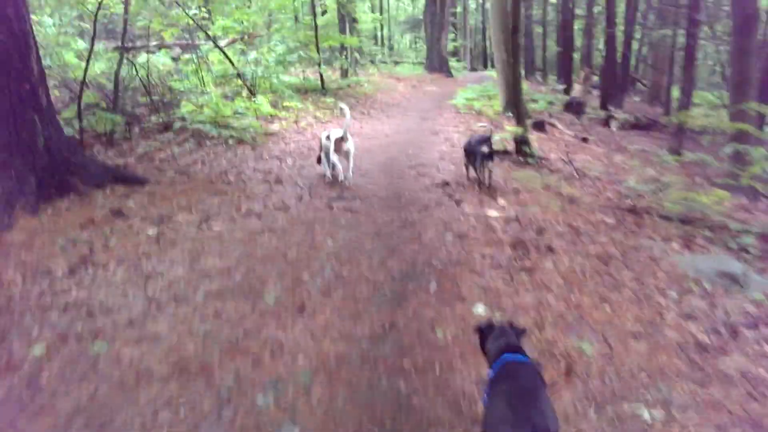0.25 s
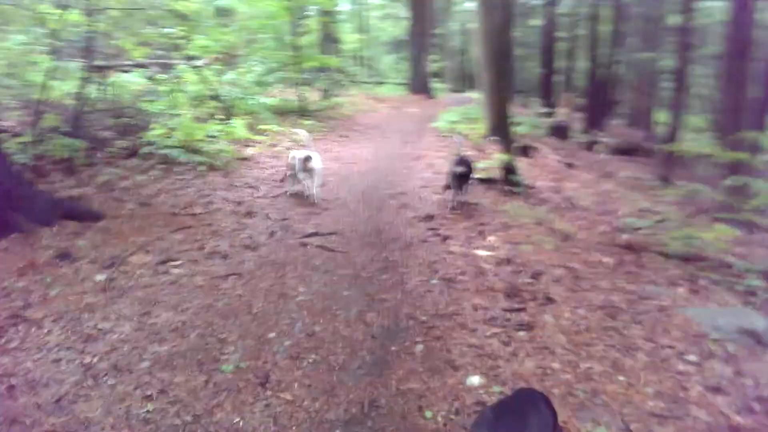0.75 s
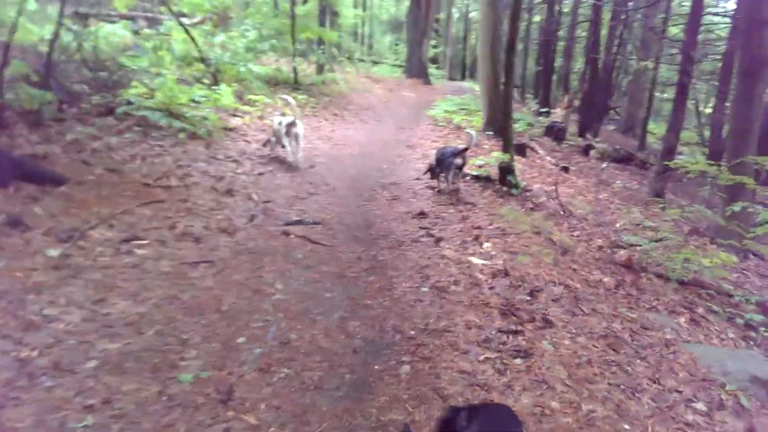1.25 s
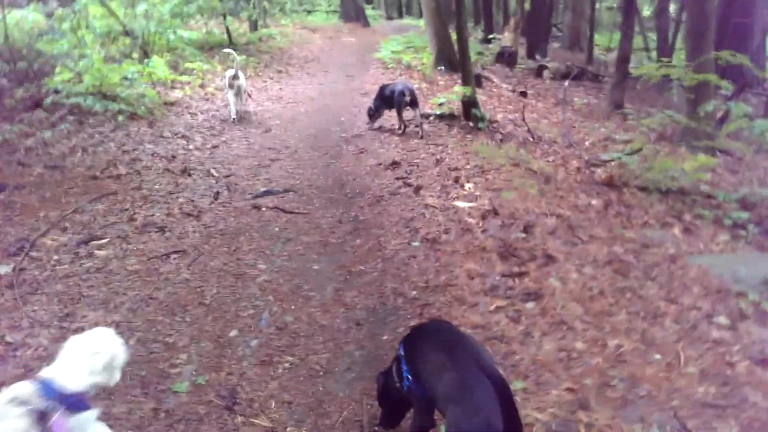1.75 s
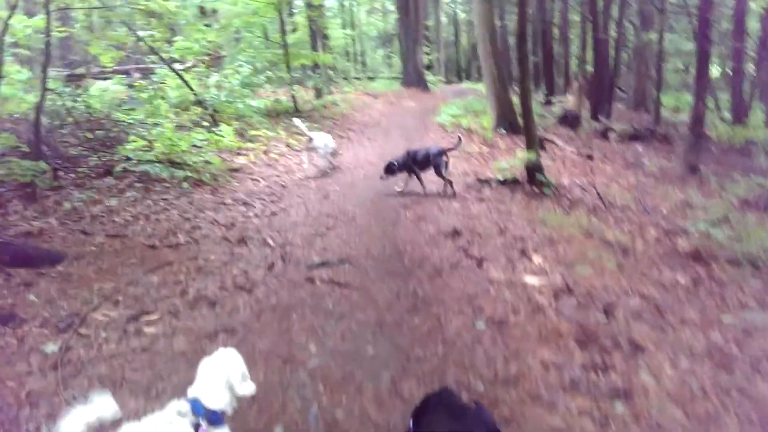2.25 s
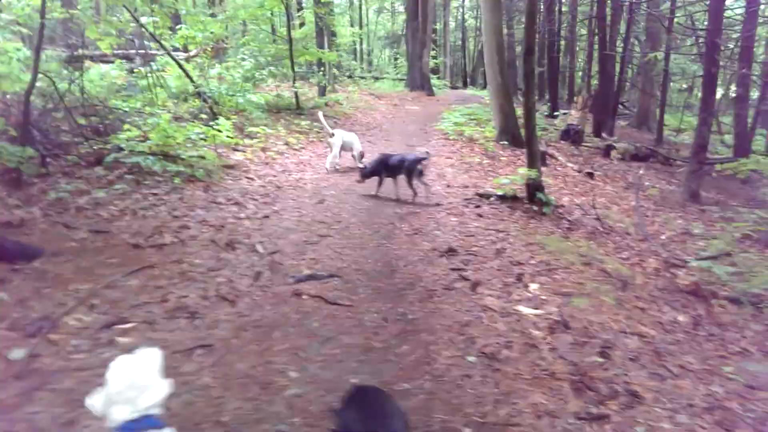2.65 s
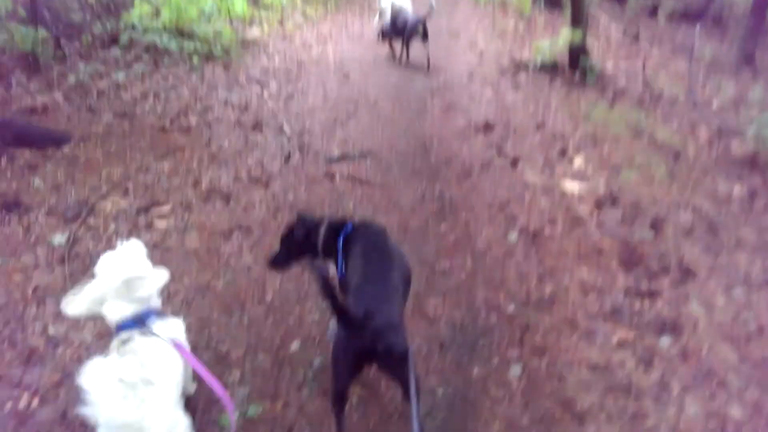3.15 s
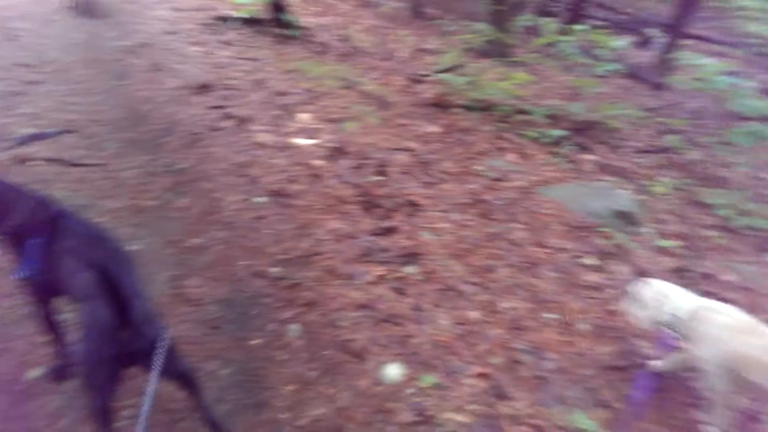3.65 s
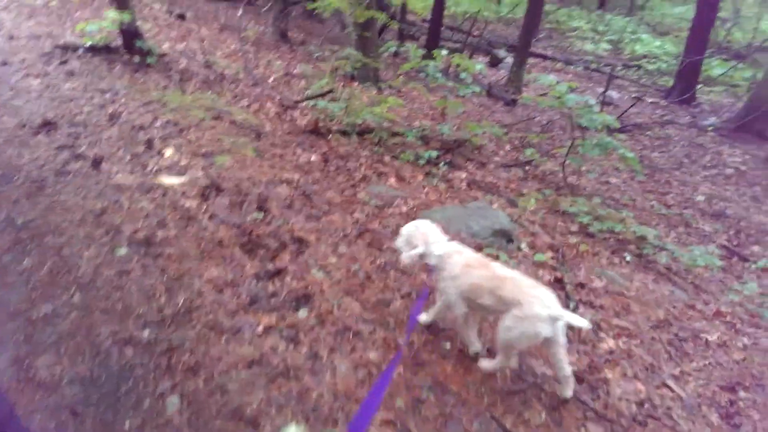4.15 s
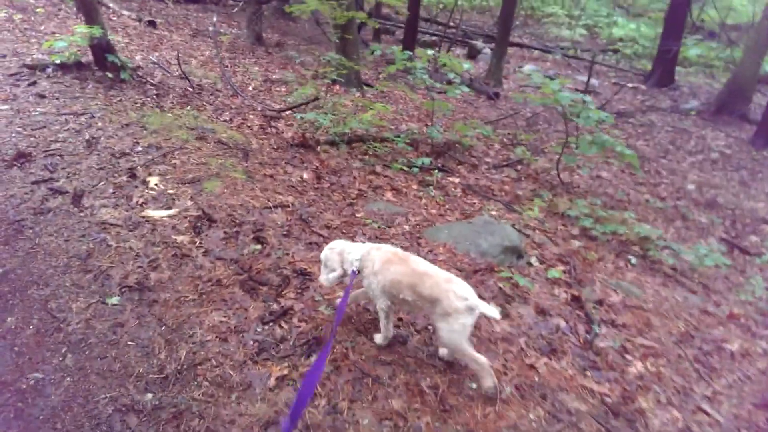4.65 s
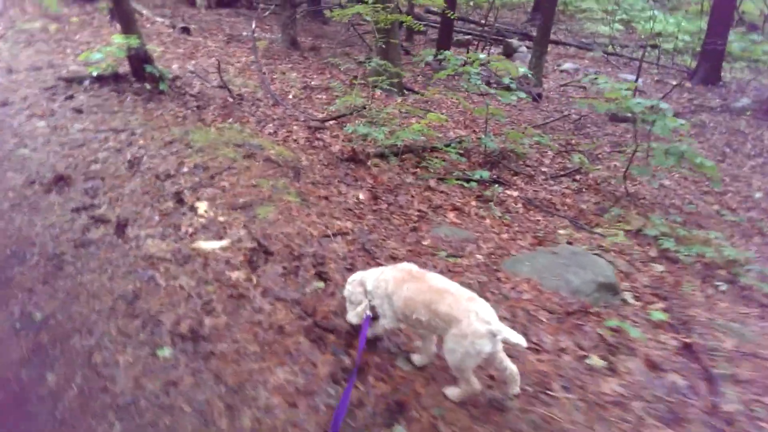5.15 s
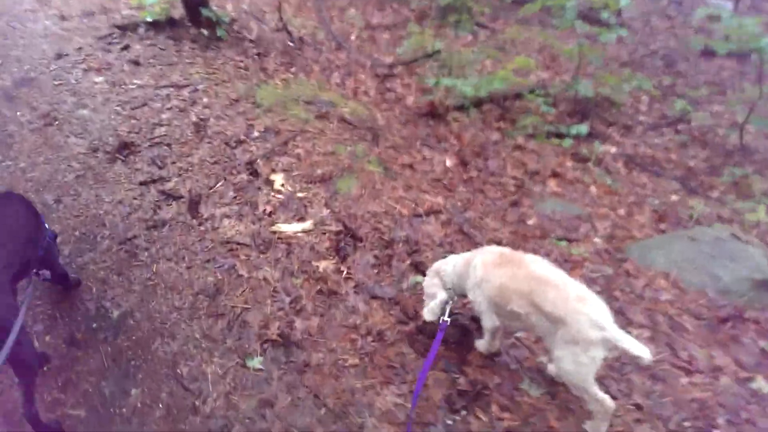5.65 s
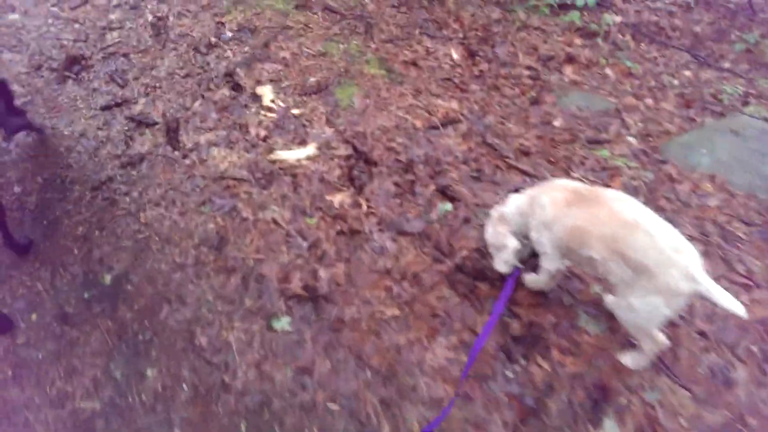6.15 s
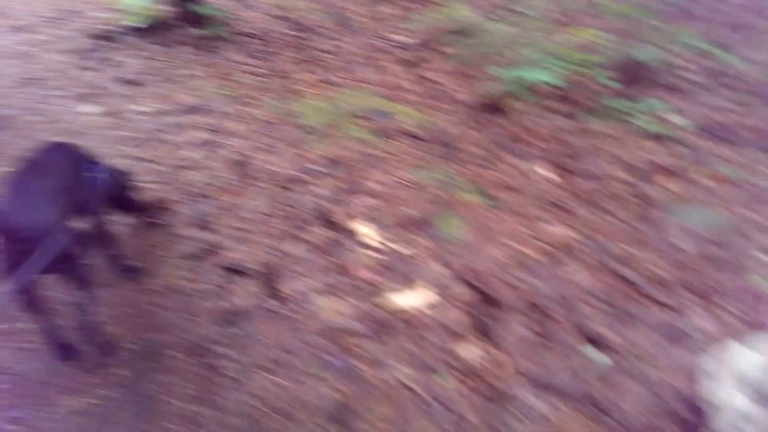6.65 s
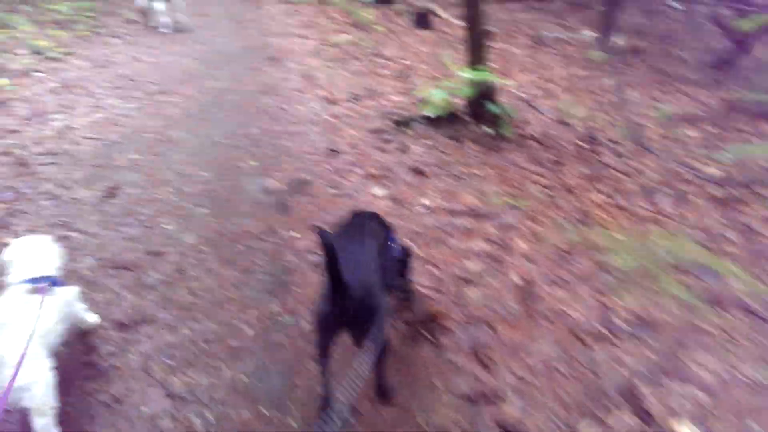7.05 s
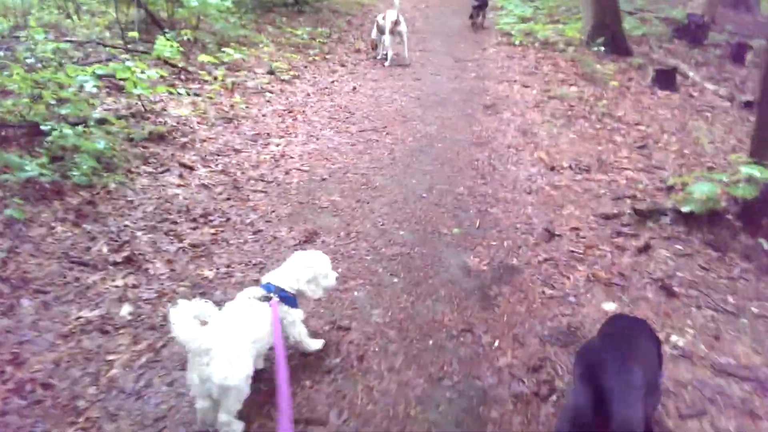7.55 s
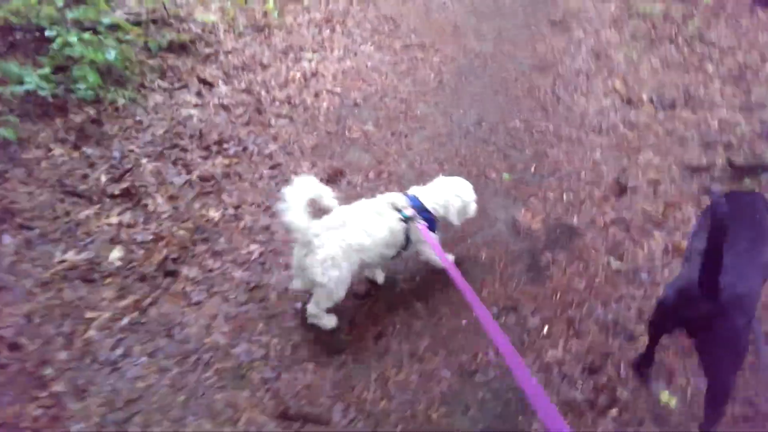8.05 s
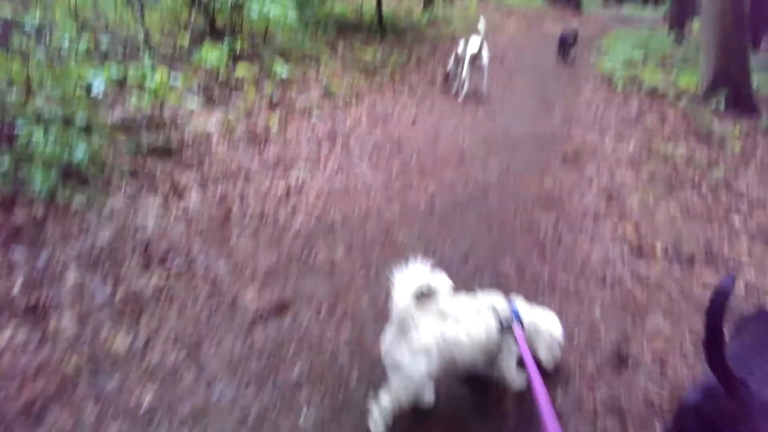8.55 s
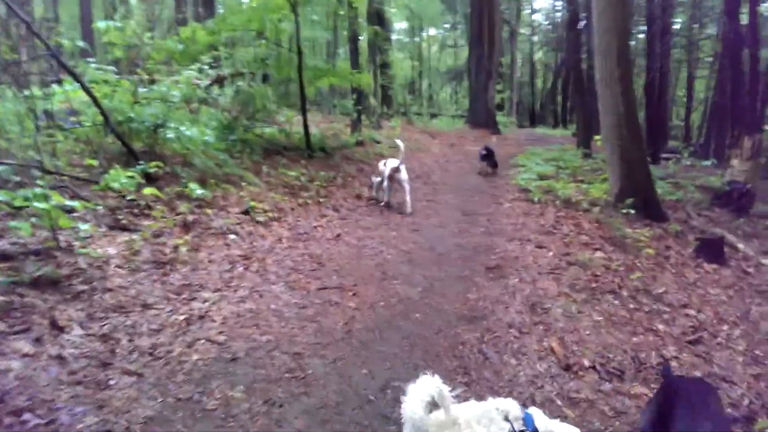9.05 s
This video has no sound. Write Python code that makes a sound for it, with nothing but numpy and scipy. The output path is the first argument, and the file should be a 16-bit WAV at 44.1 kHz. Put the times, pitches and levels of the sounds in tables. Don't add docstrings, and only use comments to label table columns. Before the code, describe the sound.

A body-level stereo microphone in quiet wet woods catches small metal sounds: light collar tag touches, a rapid rattle of steel clip and chain, then looser, sparser jingles with shivering tags. Needles crunch softly underfoot and twigs click. Four hard pops from water drops jump out in the later half, mostly on the left. Faint leaf hiss and a wavering far-off engine hum continue throughout.

```python
import sys
import numpy as np
from scipy import signal
from scipy.fft import rfft, irfft, next_fast_len
from scipy.io import wavfile
from scipy.ndimage import uniform_filter1d, map_coordinates

SR = 44100
rng = np.random.default_rng(int(sys.argv[2]) if len(sys.argv) > 2 else 0)


def dump(signal):
    limited = np.clip(np.atleast_2d(signal).T, -1, 1)
    pcm = np.round(limited * 32767).astype(np.int16)
    wavfile.write(sys.argv[1], SR, pcm)


def level_to_linear(level):
    exponent = np.asarray(level, float) / 20
    return 10 ** exponent


N = 409801

# time in seconds, level in dB.
WIND = [
    (0.0, -57),
    (0.46, -55.5),
    (9.29, -56),
]
# frequency in Hz, density in dB per Hz.
RUMBLE_COLOUR = [(20, -16), (55, -0.5), (75, 6), (130, -9), (300, -12), (600, -52)]
RUSH_COLOUR = [(150, -7.5), (350, -1), (750, 0.5), (1250, -3.5), (2200, -2.5), (3200, -11), (5000, -30.5)]
HISS_COLOUR = [(2000, -8.5), (4000, 4.5), (6000, -0.5), (8000, -4), (11500, -7), (13500, -4.5),
               (15900, -8.5), (16100, -28)]
# time in seconds, level in dB.
ROAR = [
    (0.0, -70),
    (0.98, -64.5),
    (1.01, -72),
    (4.53, -58),
    (6.18, -64),
    (6.8, -60),
    (7.86, -64.5),
    (8.49, -55),
    (8.95, -61),
    (9.29, -54),
]
# frequency in Hz, density in dB per Hz.
ROAR_COLOUR = [(95, -25), (120, 5.5), (150, -0.5), (210, -15), (400, -39)]
# time in seconds, engine note in Hz, drone level in dB.
PLANE = [(0.0, 84.3, -60.5), (0.39, 82.64, -55.5), (4.04, 83.65, -49), (5.95, 78.3, -59),
         (6.31, 75.45, -63.5), (6.78, 78.8, -67.5), (7.63, 67.7, -63), (8.2, 69.56, -64.5),
         (8.64, 75.6, -62), (9.06, 69.9, -56.5), (9.29, 68, -59)]
# centre in seconds, spread in seconds, level in dB, lowest grain in Hz.
STEPS = [
    (.75, .15, -55., 1300),
    (3.62, .17, -56.5, 1300),
    (4.1, .22, -51., 2200),
    (5.98, .06, -56., 1500),
    (7.2, .05, -57., 1400),
    (7.8, .06, -60., 1500),
    (8.3, .04, -61., 2500),
    (8.59, .03, -55., 1900),
]
# frequency in Hz, level in dB, relative ring time.
CLIP_MODES = [(3780, -21, 1), (4480, -30, 0.83), (5940, -9.5, 1.08), (6380, -8.5, 0.92), (8340, -28, 0.77),
              (9900, -25, 1.1), (10820, -7.5, 1.08), (11750, -29.5, .9), (12300, -10, 1.1),
              (13520, -8, 1.2), (14300, -27, .8), (15400, -8.5, 1.1)]
TAG_MODES = [(3456, -4, 1.6), (4500, -9, .7), (4880, 3, .9), (5610, -6, .8), (6610, -9, 1.1),
             (8470, -5, .7), (9469, -4, .9), (9710, -16, 1.1), (10270, -10, 1.9), (10630, -12, 1.2),
             (12920, -4, 1.1), (13780, -4, 1.8), (14130, -8, 1), (15370, -6, 1.3)]
# start in seconds, peak in dB, best excited frequency in Hz.
TOUCHES = [(0.0662, -45.5, 6230), (0.5337, -38.5, 5930), (1.5768, -51, 4870), (1.7923, -41, 5940),
           (1.8282, -41.5, 5390), (2.1884, -48, 5890), (2.3361, -45, 5530), (2.5404, -41, 4630),
           (2.8604, -54, 9450), (2.9272, -39, 5080), (3.0574, -42, 4480), (3.0799, -49, 8470),
           (3.3353, -36, 4800), (3.3618, -36, 6920), (3.5718, -36, 4380), (3.6022, -42, 5000),
           (4.1215, -36, 6200), (5.0948, -42, 7950), (5.228, -44, 6080), (5.3842, -41, 9270),
           (5.457, -46, 6250), (5.5368, -43.5, 5940), (5.9998, -41, 6200), (6.1474, -48, 6040),
           (6.4612, -40, 9000), (6.778, -46, 9500), (7.9673, -40, 9600), (8.519, -42, 6700),
           (8.5434, -42, 8460), (9.0638, -43, 4940)]
# start in seconds, ring in dB, scrape in dB, best excited frequency in Hz.
CLIP_HITS = [(0.4336, -49, -49, 3460), (3.991, -60, -45, 6380), (3.877, -37.5, -49, 5940),
             (3.8935, -30, -36, 10820), (3.8995, -24, -46, 10820), (3.911, -42, -44, 6200),
             (3.9332, -31, -37, 10820), (3.9618, -43, -38.5, 12300), (3.9685, -44, -43.5, 10820),
             (4.0022, -52, -43, 6380), (4.005, -20.5, -42.5, 10820), (4.0115, -36, -44, 10820),
             (4.029, -54, -47, 5940), (4.0875, -42, -34.5, 4360), (4.1295, -40, -42, 4890),
             (4.238, -51, -60, 10820), (4.308, -43, -57, 6380), (4.336, -48, -55, 10820),
             (4.3447, -34, -50, 10820), (4.3694, -52, -50, 6380), (4.401, -52, -47, 13520),
             (4.4386, -29, -31, 10820), (4.4469, -35.5, -53, 12300), (4.467, -53, -51, 15400),
             (4.502, -56, -59, 10820), (4.508, -52, -63, 6380), (4.5267, -46, -55, 10820),
             (4.6087, -49, -48, 5940), (4.6197, -35.5, -58, 15300), (4.655, -42, -42, 13520),
             (4.6605, -24.5, -35, 10820), (4.7351, -57, -56, 10820), (4.78, -54, -54, 10820),
             (4.752, -39.5, -58, 10820), (4.8293, -49, -59, 10820), (4.8437, -49, -45, 15300),
             (4.862, -54, -57, 10820), (4.922, -61, -63, 12300), (4.958, -58, -54, 10820),
             (4.87, -43, -56, 5940), (4.9339, -41, -51, 15200), (4.9826, -45, -48, 10820),
             (4.9966, -44.5, -56, 8480), (5.8306, -56, -48.5, 3460), (5.8386, -49, -63, 6500),
             (5.87, -58, -46.5, 9600), (6.264, -37.5, -44, 12300), (6.8033, -43.5, -49, 10820),
             (6.829, -59, -57, 15300)]
# start in seconds, peak in dB, frequency in Hz.
PINGS = [
    (.434, -46, 3390),
    (.488, -46, 3400),
    (1.56, -53, 5600),
    (1.578, -53, 5000),
    (1.8, -61, 5700),
    (3.293, -40, 4870),
    (6.327, -47, 3750),
    (7.261, -49, 3340),
    (7.296, -49, 3383),
    (7.526, -45.5, 3750),
]
# start in seconds, peak in dB, best excited frequency in Hz, left-right in dB.
CLACKS = [(0.4514, -37, 15300, 2), (1.977, -43, 6260, -20), (3.275, -30, 7700, -1.5),
          (3.2925, -28, 4730, -3), (3.3497, -36, 7020, 1), (3.466, -21, 14400, 5), (3.498, -23, 11800, 0),
          (3.507, -22.5, 15700, 3), (3.704, -32.5, 9900, -2.5), (3.7265, -22, 14300, -0.5),
          (3.7713, -21, 14900, -3), (3.8385, -26.5, 6500, -7), (3.8518, -26, 12200, -3),
          (4.0284, -41, 13500, 1.5), (4.0666, -28, 12200, -3), (4.1424, -41, 15000, -2.0),
          (4.1938, -30, 5800, -7.5), (4.229, -47, 6140, -5), (4.2874, -37, 6200, -3.5),
          (4.3037, -26, 15400, -8), (4.411, -29, 10900, -6.5), (5.1423, -32, 15600, -4),
          (6.424, -26, 15300, -0.5), (6.8358, -28, 13700, -1), (6.8513, -28, 10000, 2)]
# start in seconds, strength in dB.
SHIVERS = [(.45, -56), (.93, -54), (1.11, -55), (2.92, -67), (6.44, -41), (6.75, -47), (7.17, -39),
           (7.51, -43), (7.98, -53), (8.2, -59), (8.42, -42), (8.45, -72), (8.55, -48)]
# start in seconds, peak in dB.
TWIGS = [(0.4898, -50), (1.3503, -38.5), (1.951, -45), (6.056, -38), (6.3256, -36), (6.3465, -43),
         (6.6173, -36.5), (6.6028, -41), (4.252, -34.5), (6.9152, -40), (7.1072, -37), (7.1831, -45.5),
         (7.2619, -45), (7.528, -41), (7.7647, -46.5), (7.9911, -47), (8.046, -41.5), (8.6004, -58),
         (9.0039, -33.5), (9.2844, -36.5)]
# start in seconds, peak in dB.
LINKS = [(0.5801, -42.5), (1.5, -48), (1.6706, -48.5), (2.6966, -50), (3.4191, -37.5), (3.458, -39),
         (3.4757, -31), (3.8157, -38), (5.03, -51), (6.654, -44), (6.884, -48), (7.0398, -58),
         (5.1895, -40.5), (5.3642, -38), (5.5089, -47), (5.577, -40), (6.1878, -41), (6.2974, -54),
         (6.389, -37), (6.446, -52), (6.6737, -39.5), (6.9584, -45), (7.054, -41), (7.5025, -49.5),
         (7.5424, -48), (8.531, -42), (8.8952, -43.5)]
# start in seconds, peak in dB, frequency
# in Hz.
KNOCKS = [(1.951, -30.5, 820), (1.951, -37.5, 490), (8.489, -32.5, 400), (3.565, -38, 250), (4.6, -38, 280),
          (4.33, -37, 370), (4.1, -38, 200), (4.4, -39, 260), (2.396, -43, 4600), (2.452, -45, 2800),
          (2.471, -43, 3000), (6.617, -38, 2300), (3.437, -42, 2500), (8.563, -41, 2600), (4.42, -48, 250),
          (5.9, -40, 360), (5.4, -47, 260), (3.7, -39, 173), (7.2, -45.5, 210), (4.8, -46, 4600),
          (5.5, -34, 2500), (2.5, -34, 2900)]
# start in seconds, ring in dB, scrape in dB, best excited frequency in Hz,
# left-right in dB.
TAG_HITS = [(2.0931, -51, -70, 13930, -7), (2.0998, -39, -48, 14500, 2), (2.1333, -52, -41.5, 3460, 2),
            (2.1485, -47, -46, 8400, -7), (2.1602, -54, -57, 15300, 15), (2.5507, -64, -49, 14000, 13),
            (2.8386, -50, -46, 6390, -1.5), (2.8875, -58, -43.5, 9470, -3), (2.9645, -46, -57, 9470, -2),
            (2.957, -54, -56, 15370, 2), (2.9793, -51, -66, 4900, 0), (3.0218, -50.5, -69, 5600, 17),
            (3.0285, -58, -55, 5920, -11), (3.1016, -36.5, -50, 8470, -1), (3.1131, -41, -52, 10280, 1),
            (3.2153, -48, -48, 9710, 0.5), (3.0574, -54.5, -58, 12930, 2), (6.7315, -53.5, -54, 8480, 0),
            (8.403, -56, -59, 12930, 5), (8.43, -52, -60, 12930, 6), (3.6395, -43.5, -41, 14100, -2),
            (3.6652, -60, -45, 14000, 2), (5.6779, -38, -44, 8480, -3.5), (5.6993, -47, -58, 10280, -1.5),
            (5.7288, -41, -58, 13870, 3), (5.8224, -59, -43, 9500, -3), (7.133, -47, -33.5, 10630, -2),
            (8.6799, -56.5, -50.5, 12160, 9)]
# start in seconds, peak in dB, frequency in Hz, 60 dB
# decay in seconds.
NOTES = [(3.103, -42, 3440, 0.11), (3.292, -51, 10150, .06), (2.1, -40, 5610, .04), (2.1, -43, 4880, .05),
         (5.679, -38, 4890, .05), (4.752, -43, 6380, .04), (4.87, -42, 5940, .04), (3.102, -41, 4870, .06),
         (4.935, -44, 5940, .06), (9.284, -41, 3770, .03), (4.985, -47, 5940, .08),
         (2.161, -43, 14130, .04), (4.308, -41, 6300, .07), (4.736, -48, 10820, 0.14),
         (4.83, -50, 10820, .12), (4.983, -45, 10820, 0.086), (3.772, -46, 10900, .1),
         (7.134, -50, 10630, .1), (2.979, -39.5, 4890, .1), (3.02, -38, 5580, 0.082),
         (3.218, -38, 9710, 0.09), (3.362, -43, 6910, .04), (3.965, -31, 11800, .025),
         (3.991, -37, 6420, 0.013), (4.52, -50, 12300, .04), (6.852, -26, 10060, 0.025),
         (6.852, -41, 7000, .04), (6.93, -48, 13000, 0.016), (6.954, -50, 10000, .04),
         (7.262, -47, 10000, .02), (8.42, -49.5, 4860, .06), (8.679, -45, 9440, .03),
         (9.066, -54, 4910, .02), (4.029, -40, 8900, .01), (4.086, -35, 8900, .01)]
# start in seconds, peak in dB, swing in Hz, push (+) or pull (-), far port in dB.
DRIPS = [
    (5.7675, -2, 3800, 0.94, -6.5),
    (5.8911, -9.5, 3070, 0.87, -18),
    (7.5741, -2.5, 3740, -1.01, -9),
    (8.8462, -6, 3510, -0.91, -18),
]

CLACK_BURST_DB, CLACK_RING_DB = -10, -21
TOUCH_BURST_DB, TOUCH_RING_DB = -10, -6.5
TWIG_BURST_DB, TWIG_RING_DB = -9, -16


def unit(x):
    return x / np.sqrt(np.mean(x ** 2) + 1e-20)


def curves(rows):
    s, *cols = np.transpose(rows)
    return [np.interp(np.arange(N) / SR, s, c) for c in cols]


def wobble(rate_hz):
    knots = rng.standard_normal(int(N * rate_hz / SR) + 4)
    return map_coordinates(knots, [np.arange(N) * rate_hz / SR])


def pan(pair, pan_db):
    return pair * level_to_linear([[pan_db / 2], [-pan_db / 2]])


def ports(x, pan_db, lag):
    return pan(np.array([np.roll(x, lag), x]), pan_db)


def noise(colour, alike, pan_db, patchy_db):
    z = signal.stft(rng.standard_normal((3, N)), nperseg=512)[2]
    field = uniform_filter1d(uniform_filter1d(rng.standard_normal(z.shape[1:]), 6, 0), 12, 1)
    white = signal.istft(z * level_to_linear(patchy_db * unit(field)), nperseg=512)[1][:, :N]
    hz, db = np.transpose(colour)
    m = next_fast_len(N)
    gain = level_to_linear(np.interp(np.log(np.fft.rfftfreq(m, 1 / SR) + 1), np.log(hz), db, left=-40, right=-120))
    common, *own = irfft(rfft(white, m) * gain, m)[:, :N]
    pair = np.sqrt(alike) * ports(common, 0, lag=15) + np.sqrt(1 - alike) * np.array(own)
    pair = pan(pair, pan_db)
    return pair / np.sqrt(np.mean(pair.mean(0) ** 2))


def woods():
    wind_db, = curves(WIND)
    drone_db = curves(PLANE)[1]
    rumble_db = -56 + (wind_db - wind_db.mean()) + 0.082 * (drone_db - drone_db.mean())
    gust_db = .4 * wobble(2.8)
    rumble = level_to_linear(rumble_db + 0.25 * wobble(6.3)) * noise(RUMBLE_COLOUR, 0.93, 4.5, patchy_db=1.0)
    rush = level_to_linear(wind_db - 0.63 + gust_db) * noise(RUSH_COLOUR, 0.51, 6.1, patchy_db=1.53)
    roar = level_to_linear(curves(ROAR)[0] - 1.5) * noise(ROAR_COLOUR, 0.855, 6.2, patchy_db=1.0)
    hiss = level_to_linear(-66.0 + gust_db) * noise(HISS_COLOUR, .1, 0.93, patchy_db=1.1)
    return rumble + rush + roar + hiss


def plane():
    hz, db = curves(PLANE)
    tone = np.sqrt(2) * np.sin(2 * np.pi * np.cumsum(hz + 2.65 * wobble(7)) / SR)
    return ports(level_to_linear(db + 0.91 * wobble(5)) * tone, 5.9, lag=23)


def grains(when_s, level_db, low_hz, spread):
    pitch, size, side = rng.random((len(when_s), 3)).T
    t = np.arange(64) / SR
    hz = low_hz * spread ** pitch[:, None]
    size_db = level_db - 5.13 * np.log(size[:, None] + 0.09)
    cycles = level_to_linear(size_db - 60 * t * hz / 6) * np.sin(2 * np.pi * hz * t)
    at = np.clip((when_s * SR).astype(int), 0, N - 64)[:, None] + np.arange(64)
    return np.array([np.bincount(at.ravel(), (cycles * w[:, None]).ravel(), N) for w in (0.55 + side, 1 - side)])


def patter():
    return grains(rng.random(1500) * N / SR, -64., 1700, 3.74)


def ring(modes, best_hz, t60_s, focus_db, t, draw):
    hz, db, lasting = np.transpose(modes)
    size, detune, life, phase, turn = draw[:, :len(hz), None]
    away_db = -focus_db * np.sqrt(abs(np.log2(hz / best_hz)))
    strength = level_to_linear(db + away_db)[:, None] * level_to_linear(2.8 * size)
    fade = level_to_linear(-60 * t / (t60_s * lasting[:, None] * np.exp(0.18 * life))) * (1 - np.exp(-t / 0.00056))
    angle = 2 * np.pi * (hz[:, None] * (1 + 0.0027 * detune) * t + phase)
    return np.array([(strength * fade * np.sin(angle + side * 1.1 * turn)).sum(0) for side in (1, -1)])


def contact(modes, t60_s, focus_db, ring_db, scrape_db, best_hz, chatter_s, grit_s):
    size = 3072
    t, hz = np.arange(size) / SR, np.fft.rfftfreq(size, 1 / SR) + 1
    draw, grit, bounce = rng.standard_normal((5, 15)), rng.standard_normal((3, size)), rng.random((2, 6))
    bounce_at = (bounce[0] ** 1.5 * chatter_s * SR).astype(int) + 50
    train = np.bincount(bounce_at, level_to_linear(-8 - 9 * bounce[1]), size)
    train[[0, 50]] = .3, 1
    burst = signal.fftconvolve(train, level_to_linear(-60 * t / grit_s) * (1 - np.exp(-t / 0.00043)))[:size]
    colour = level_to_linear(-9 * np.minimum(abs(np.log2(hz / best_hz)), 1.2)) / (1 + (2900 / hz) ** 4)
    lumps = map_coordinates(rng.standard_normal(40), [hz / 700])
    colour *= level_to_linear(4.5 * lumps)
    scrape = burst * irfft(rfft(grit[0] + 3.2 * grit[1:]) * colour)
    rung = signal.fftconvolve(ring(modes, best_hz, t60_s, focus_db, t, draw), train[None], axes=1)[:, :size]
    return sum(level_to_linear(db) * x / np.sqrt(np.mean(x[:, :400] ** 2)) for db, x in ((ring_db, rung), (scrape_db, scrape)))


def strikes(hits, modes, t60_s, focus_db, chatter_s, grit_s):
    out = np.zeros((2, N + SR))
    for s, ring_db, scrape_db, best_hz, pan_db in hits:
        pair = contact(modes, t60_s, focus_db, ring_db, scrape_db - 3.0, best_hz, chatter_s, grit_s)
        left, right = pan(pair, pan_db)
        start = round(s * SR) - 50
        out[0, start + (12 if pan_db > 0 else -12):][:len(left)] += left
        out[1, start:][:len(right)] += right
    return out[:, :N]


def light_touches(touches):
    hits = [(s, db + TOUCH_BURST_DB + TOUCH_RING_DB, db + TOUCH_BURST_DB, hz, rng.normal(0, 5.6)) for s, db, hz in touches]
    return strikes(hits, TAG_MODES[::2] + CLIP_MODES[2::2], .03, 22, .003, .006)


def tag_touches():
    return light_touches(TOUCHES)


def leash_clip():
    hits = [(*hit, -5.5) for hit in CLIP_HITS]
    return strikes(hits, CLIP_MODES, .018, 11, .005, .009)


def rattle(hits, modes, best_hz, t60_s, level_db, pan_db):
    s, db = np.transpose(hits)
    jolt = np.bincount((s * SR).astype(int), level_to_linear(0.48 * db), N)
    t = np.arange(-1024, 4096) / SR
    swell = np.where(t < 0, level_to_linear(60 * t / 0.12), level_to_linear(-60 * t / 0.21))
    shake = signal.fftconvolve(jolt, swell)[1024:][:N]
    chance, size = rng.random((2, N))
    blows = (chance < .006 * level_to_linear(8 * wobble(70))) * level_to_linear(-3 * np.log(size + .02)) * np.sign(rng.standard_normal(N))
    t = t[1024:]
    body = ring(modes, best_hz, t60_s, 3.6, t, rng.standard_normal((5, 15)) / 2)
    highpass = signal.butter(2, 2600, "high", fs=SR, output="sos")
    grit = signal.sosfilt(highpass, rng.standard_normal(body.shape))
    body += 1.6 * grit * level_to_linear(-60 * t / 0.02)
    sound = signal.fftconvolve((blows * shake)[None], body / np.linalg.norm(body[0]), axes=1)[:, :N]
    return pan(level_to_linear(level_db) * sound, pan_db)


def loudest(hits):
    return [(hit[0], max(hit[1:3])) for hit in hits]


def chain_chatter():
    blows = loudest(CLIP_HITS) + [(s, db + CLACK_BURST_DB) for s, db, *_ in CLACKS]
    return rattle(blows, CLIP_MODES, 10820, .035, -18, -2.5)


def soft_notes(rows):
    out, t = np.zeros(N + SR), np.arange(5000) / SR
    for s, db, hz, t60_s, rise_s in rows:
        envelope = level_to_linear(db - 60 * t / t60_s) * (1 - np.exp(-t / rise_s))
        out[round(s * SR):][:len(t)] += envelope * np.sin(2 * np.pi * hz * t)
    return out[:N]


def buckle_pings():
    return ports(soft_notes([(s, db, hz, 110 / hz, 0.4 / hz) for s, db, hz in PINGS]), 17.4, lag=0)


def tag_shivers():
    return rattle(SHIVERS, TAG_MODES[6:], 16000, 0.032, -14, 0)


def chain_clacks():
    hits = [(s, db + CLACK_BURST_DB + CLACK_RING_DB, db + CLACK_BURST_DB, hz, pan_db) for s, db, hz, pan_db in CLACKS]
    return strikes(hits, CLIP_MODES, .022, 13, .004, .007)


def twigs():
    hits = [(s, db + TWIG_BURST_DB + TWIG_RING_DB, db + TWIG_BURST_DB, 3900, rng.normal(0, 4.6)) for s, db in TWIGS]
    return strikes(hits, TAG_MODES[:3], .015, 22, .0012, .004)


def link_touches():
    return light_touches([(s, db, 13000 * np.exp(0.038 * rng.standard_normal())) for s, db in LINKS])


def steps():
    return sum(grains(s + spread_s * rng.standard_normal(400), db + 5.5, hz, 3.35) for s, spread_s, db, hz in STEPS)


def ground_knocks():
    return ports(soft_notes([(s, db, hz, 6.5 / hz, 0.4 / hz) for s, db, hz in KNOCKS]), 17.4, lag=0)


def tags():
    return strikes(TAG_HITS, TAG_MODES, .065, 9.5, .008, .009)


def tag_chatter():
    return rattle(loudest(TAG_HITS), TAG_MODES, 8400, 0.018, -14.5, 1.3)


def single_notes():
    return ports(soft_notes([(*row, .0006) for row in NOTES]), -1.4, lag=0)


def drips():
    out, t = np.zeros((2, N)), np.arange(160) / SR
    thin = np.sin(2 * np.pi * 7400 * t) * level_to_linear(-60 * t / .0016)
    for s, db, hz, sign, far_db in DRIPS:
        swing = np.sin(2 * np.pi * hz * t) * (t < 1 / hz)
        late = np.maximum(t - 1 / hz, 0)
        shell = sum(a * np.sin(2 * np.pi * f * late) for f, a in ((3400, 1), (2250, 0.24), (950, 0.5)))
        shell *= np.exp(-(late / .0013) ** 3)
        far = 0.7 * thin + 0.13 * np.roll(thin, 12) - 0.078 * shell
        start = round(s * SR)
        out[0, start:][:len(t)] += sign * level_to_linear(db) * (swing - .13 * shell)
        out[1, start + 11:][:len(t)] += sign * level_to_linear(db + far_db) * far
    return out


def scene():
    far = woods() + plane() + patter()
    chain = leash_clip() + chain_chatter() + chain_clacks() + link_touches()
    collar = tag_touches() + buckle_pings() + tag_shivers() + tags() + tag_chatter() + single_notes()
    ground = twigs() + steps() + ground_knocks()
    return far + chain + collar + ground + drips()


def band_limit(x):
    return signal.sosfilt(signal.butter(12, 16990, fs=SR, output="sos"), x)


def record(dry):
    edge = signal.butter(20, 15900, fs=SR, output="sos")
    mix = signal.sosfilt(edge, dry)
    return band_limit(mix)


dry = scene()
out = record(dry)
dump(out)
```